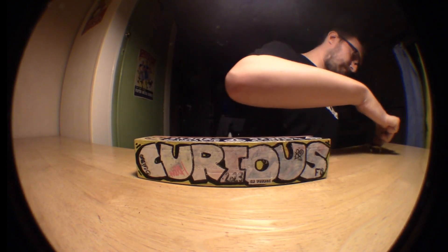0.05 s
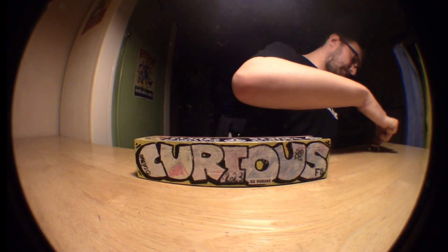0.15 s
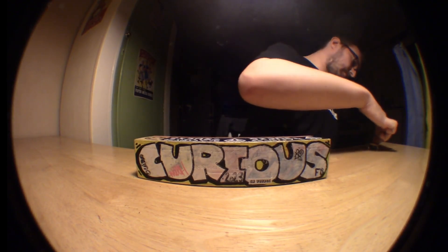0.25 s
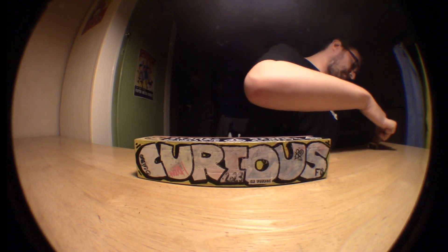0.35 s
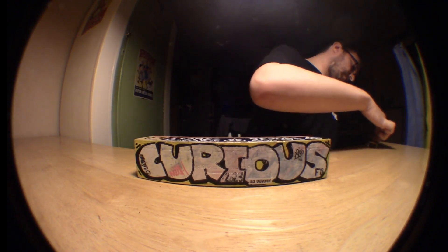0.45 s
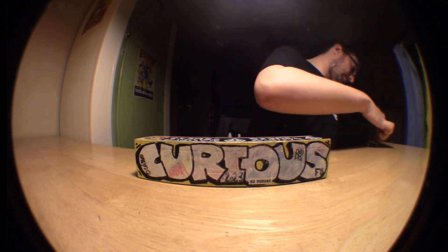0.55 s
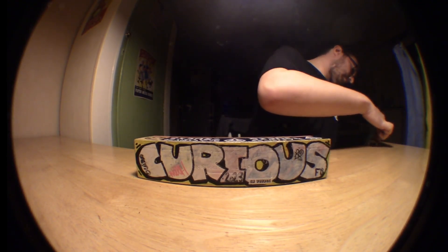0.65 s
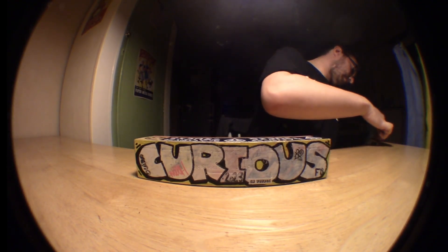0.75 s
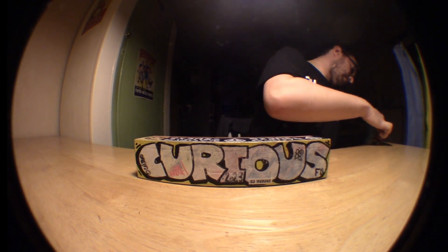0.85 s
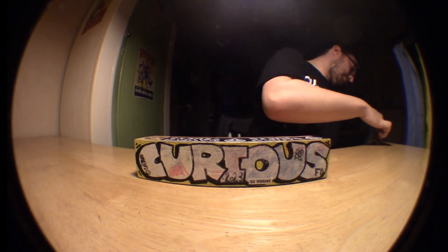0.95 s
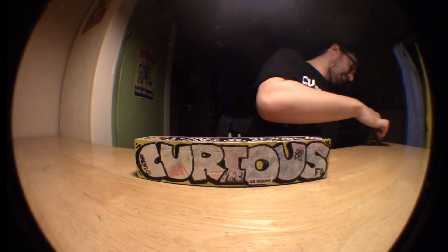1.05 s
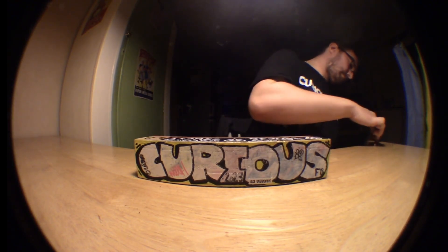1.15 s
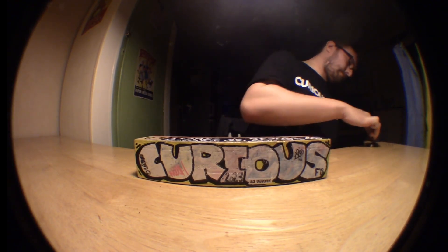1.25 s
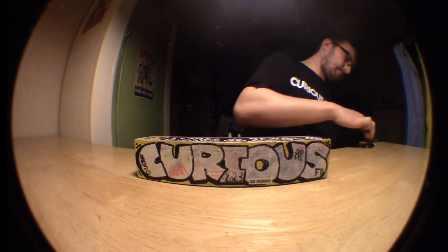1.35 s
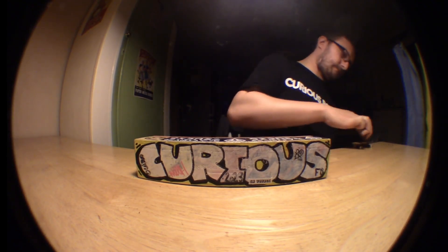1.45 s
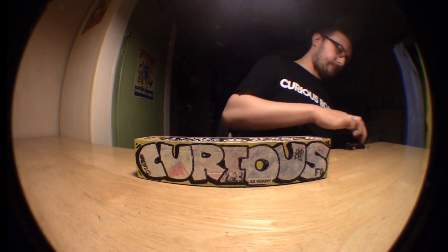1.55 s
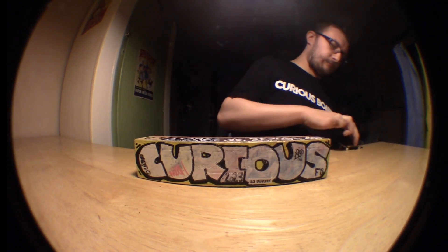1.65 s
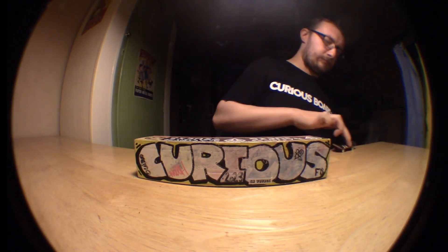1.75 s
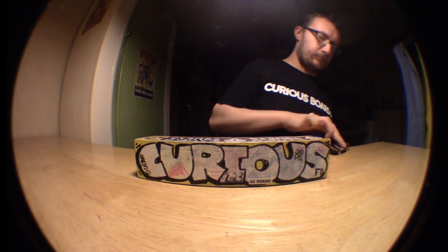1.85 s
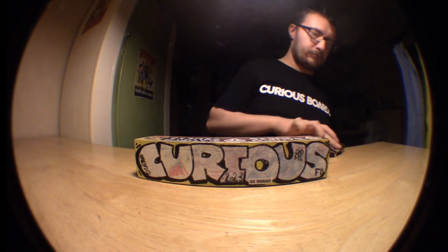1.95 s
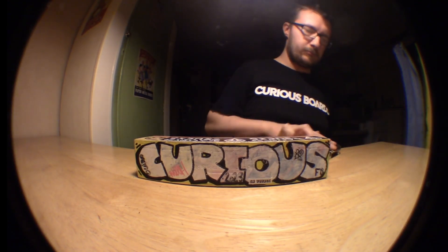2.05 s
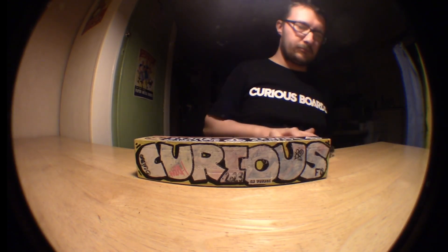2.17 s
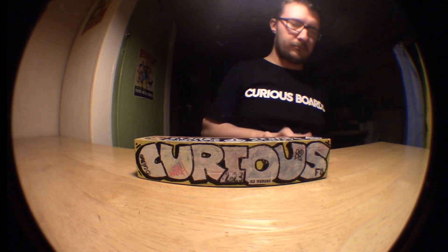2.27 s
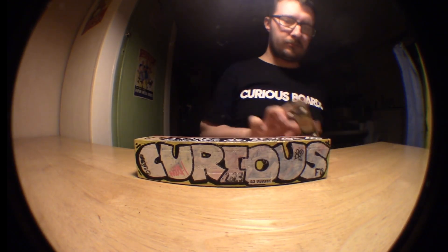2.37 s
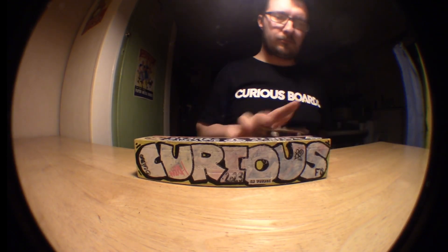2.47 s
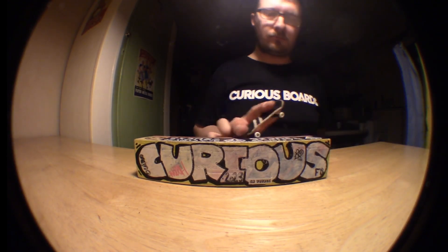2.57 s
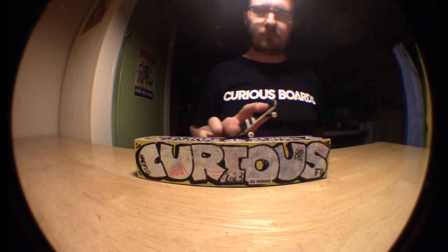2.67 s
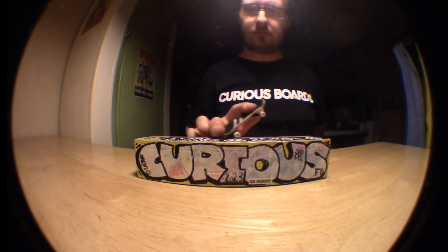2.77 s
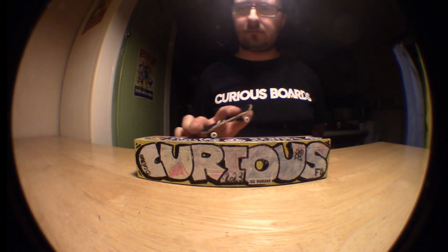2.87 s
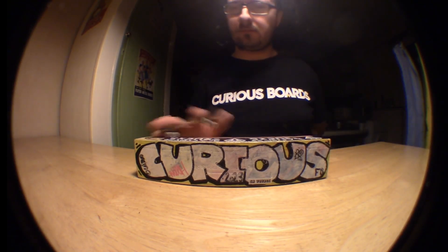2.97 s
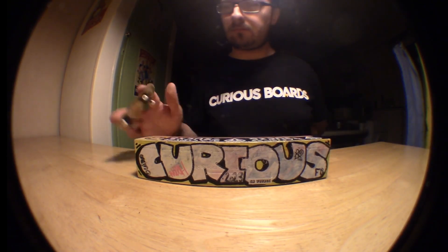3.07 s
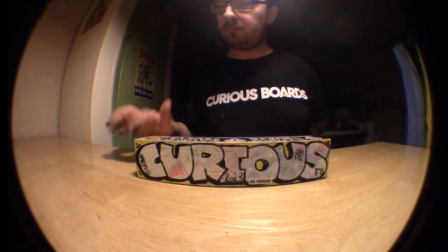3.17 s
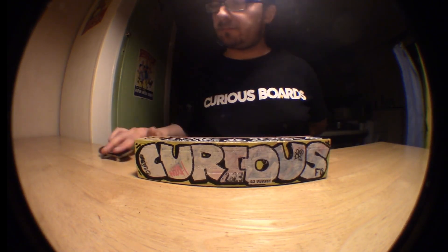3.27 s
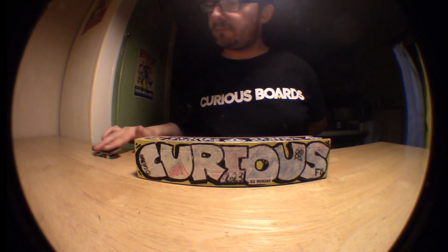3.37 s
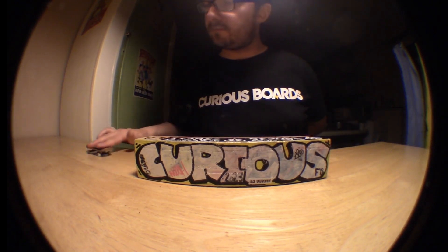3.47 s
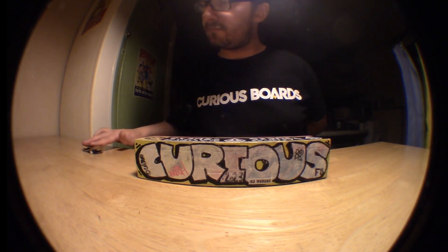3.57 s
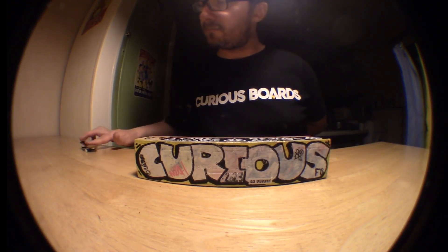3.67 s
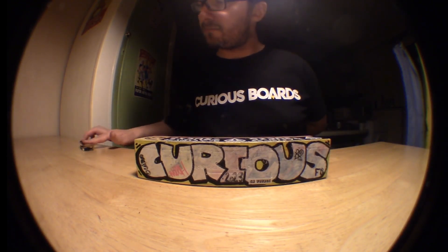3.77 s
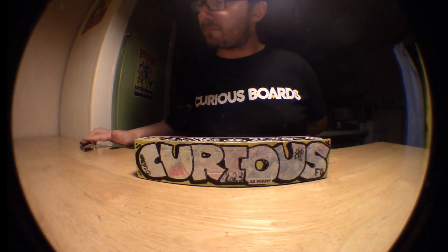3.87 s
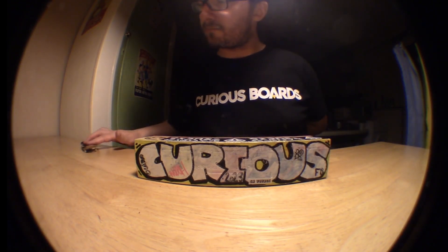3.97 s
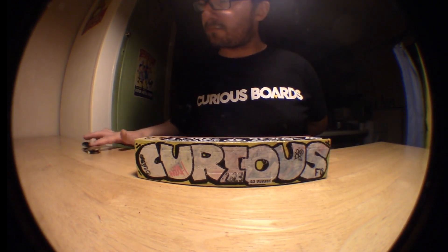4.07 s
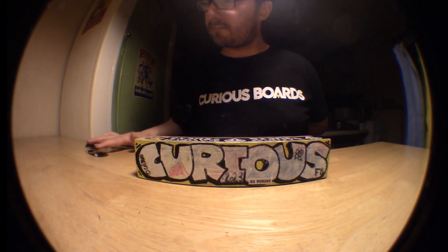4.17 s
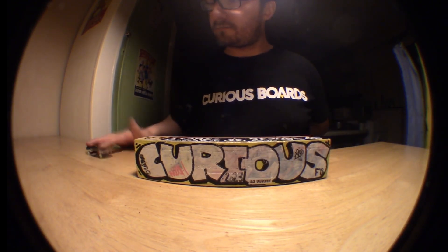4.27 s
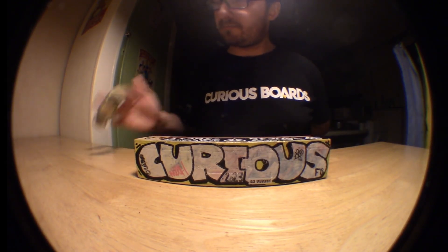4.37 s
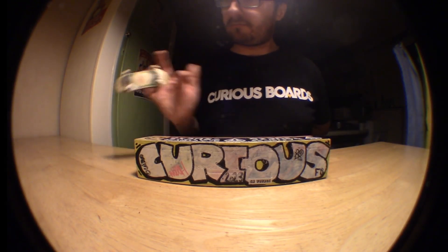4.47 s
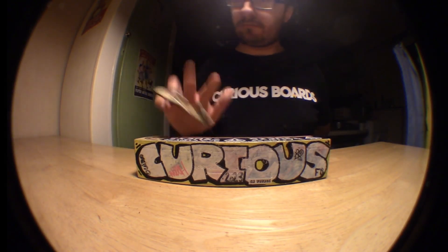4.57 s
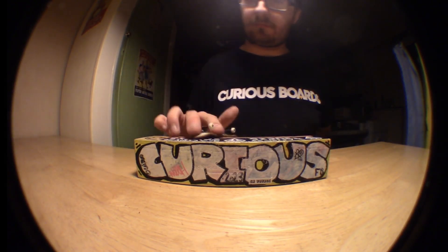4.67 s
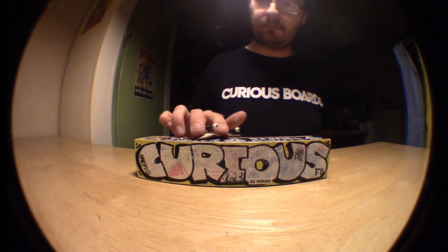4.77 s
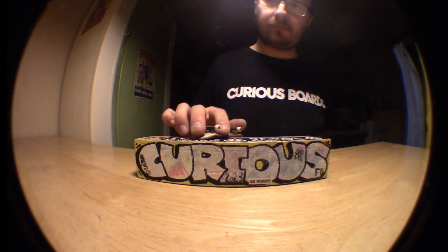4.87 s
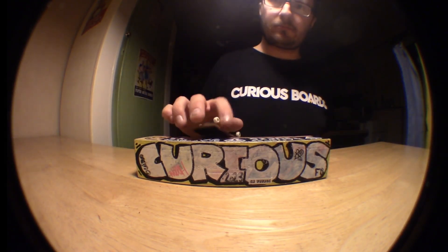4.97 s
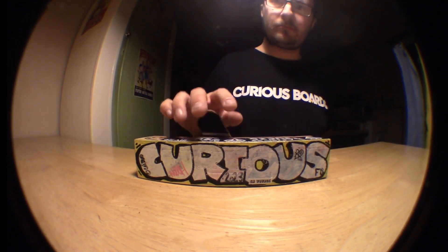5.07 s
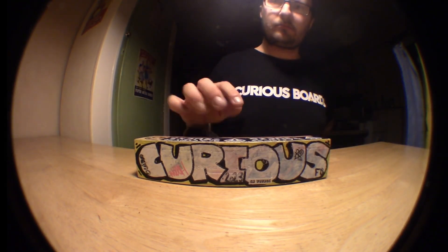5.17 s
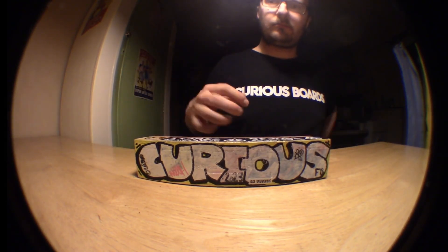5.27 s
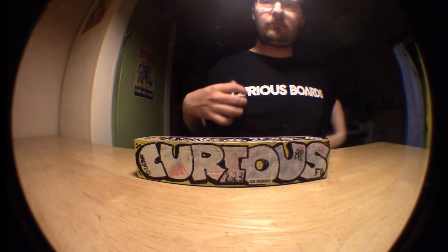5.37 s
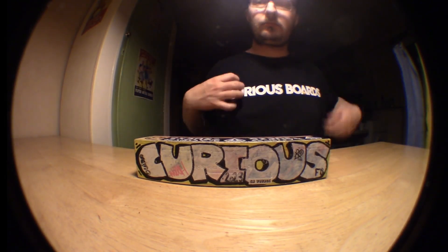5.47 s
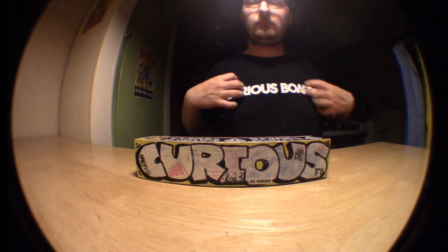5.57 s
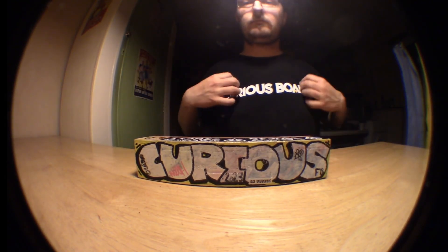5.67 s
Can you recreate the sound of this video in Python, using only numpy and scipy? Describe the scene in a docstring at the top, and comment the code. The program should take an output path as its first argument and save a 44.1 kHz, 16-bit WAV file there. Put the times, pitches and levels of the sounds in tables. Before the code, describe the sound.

Close up in a small, slightly echoing room, a toy finger skateboard rumbles lightly across a wooden table. A sharp pop leads to quick clacks and a squeaky scrape along a hollow box, then a hard landing. After more rolling comes another pop, loud clacks with a brief scrape, and a final clatter on the wood. Dull hand thuds sit faintly underneath.

```python
"""A fingerboard clacks on a wooden tabletop and a small hollow box: each contact cracks and rings modes.
It rolls up on hard wheels, pops off its tail, lands on the box and grinds along it with stick-slip
squeals, drops back to the table, returns for a second trick and clatters to rest.
The box is close; the table is heard mostly through a small, live room. Hand thuds and air lie beneath."""
import sys
import numpy as np
from scipy import signal
from scipy.fft import rfft, irfft, next_fast_len
from scipy.io import wavfile
from scipy.ndimage import map_coordinates

SR = 44100
rng = np.random.default_rng(int(sys.argv[2]) if len(sys.argv) > 2 else 0)


def log_audio(samples):
    """Write samples as a 16-bit WAV file to the path given in sys.argv[1]."""
    # one column per channel
    frames = np.atleast_2d(samples).T
    # limit to full scale, then quantise
    limited = np.clip(frames, -1, 1)
    pcm = np.round(limited * 32767).astype(np.int16)
    wavfile.write(sys.argv[1], SR, pcm)


N = 252693

# tabletop with the deck on it: pitch_hz, level_db, t60_s
TABLE_MODES = [(193, -11.5, 0.16), (334.7, -7.5, 0.16), (446, -3.5, 0.01), (510.4, 2.5, 0.12),
               (597, -3.5, 0.14), (810, -7, 0.28), (1206, -8, 0.0037), (1350, 7.5, 0.0064),
               (1690, -34, 0.0021), (1920, -36, 0.0088), (2630, 5, 0.039), (3860, 29, 0.0074),
               (4550, 4.5, 0.026), (5330, -23, 0.016), (7570, -5.5, 0.0055)]
# spectrum of a bare contact: freq_hz, density_db
CRACK_SPECTRUM = [(25, -7.5), (70, 5.5), (150, -14), (500, 15), (1000, 4), (2500, 4.5), (4500, 11.5),
                  (6000, -4), (8000, -8), (11000, -17), (16000, -54)]


def table_clacks():
    """The wheels click on the tabletop; the board lands and clatters on it."""
    hits = [(1.5545, -27.5, -22, 1), (2.025, -33, -8, -4), (3.2597, -2.5, -12, -3.5), (3.264, -3.5, 3, 0.5),
            (3.2816, -7, -13, 5), (5.1107, 3.5, -5.5, -12.5), (5.232, -16, 0, 1), (5.279, -10.5, 0, 1),
            (5.2834, -4, 4, 3.5), (5.3398, -14, 0.5, 2.5), (5.3684, -10.5, 4, 5), (5.4066, -11, -27, -1)]  # start_s, level_db, weight_db, hardness_db
    return strikes(hits, TABLE_MODES, gain_db=18, crack_db=0.5, crack_t60_s=0.029, wet_db=-0.5,
                   knock_db=-5.5, ring_db=-2, tick_db=-17.5, low_cut_hz=83, dull_hz=2360)


def box_clacks(modes):
    """The board strikes the hollow box."""
    hits = [(2.5197, -2, -9.5, 4.5), (2.529, 2.5, -8, -12), (2.5705, -0.5, -16, -1),
            (2.5965, -2.5, -4, -1.5), (2.6105, -1.5, 0.5, -9.5), (2.762, -9, -2, -12.5),
            (2.779, -4.5, -12, -5.5), (2.7945, -0.5, -6, -5.5), (2.801, -2.5, -23, -0.5),
            (2.83, -1, -2.5, -8), (2.901, -8.5, -40, 2.5), (2.9218, -2.5, -10, -1.5), (2.999, -5, -16, 4.5),
            (3.0372, -7, -20, 6), (4.6493, 9.5, -12.5, -7), (4.665, 3.5, -12, -7), (4.6962, -1.5, 0, -3),
            (4.727, -1, 2, -8), (4.7564, 2, -12, -4.5)]  # start_s, level_db, weight_db, hardness_db
    return strikes(hits, modes, gain_db=12, crack_db=-3.5, crack_t60_s=0.031, wet_db=-1.5,
                   knock_db=-1, ring_db=0, tick_db=-10, low_cut_hz=100, dull_hz=1380, full_hz=5420)


def tail_pops():
    """The deck's tail snaps against the table."""
    pops = [(2.3518, -2), (4.3562, -4)]  # start_s, level_db
    modes = [(279, -27, 0.047), (351, -4, 0.027), (480, 14, 0.07), (601, -10, 0.26), (698, -3, 0.087),
             (1330, 1, 0.034), (1890, -5, 0.034), (3610, 5, 0.013), (4000, 6, .009), (4920, -5, 0.0032),
             (5410, -1.5, 0.03), (6330, -1.5, 0.0068), (7500, -12.5, 0.013), (9600, -22, 0.0053)]  # tail on tabletop: pitch_hz, level_db, t60_s
    return strikes(pops, modes, gain_db=9, crack_db=-6, crack_t60_s=0.016, wet_db=3,
                   knock_db=3, ring_db=3, tick_db=-1, low_cut_hz=186, dull_hz=2500)


def grinding(modes):
    """The trucks catch and slip along the box edge; three contacts ring it at shifting strengths."""
    slides = [(2.559, 2.641, -22.5, 1.5, 2.5), (2.658, 2.766, -30, -5.5, -0.5), (2.751, 2.807, -22, 1, 2),
              (2.83, 2.928, -19.5, 2.5, 2), (2.94, 3.07, -20.5, -0.5, 5), (4.703, 4.773, -17, -4.5, -3)]  # start_s, end_s, level_db, weight_db, bright_db
    cavity = [(158, 58, 12.5), (370, 28, 1)]  # air in the box: centre_hz, width_hz, gain_db
    top_hz = 10350
    scrape = np.zeros(N)
    for _ in range(3):
        slips = grains(rate_hz=200, spread_db=5.5) + 0.57 * rng.standard_normal(N)
        response = impact(modes, crack_db=-1, crack_t60_s=0.02, scatter_db=4, low_cut_hz=116)
        scrape += amp(3.3 * wobble(22)) * signal.oaconvolve(slips, response)[:N]
    scrape = filtered(scrape, lambda hz: amp(peaks_db(cavity, hz)) / np.hypot(1, (hz / top_hz) ** 4))
    boom, knock, ring, metal = map(unit, bands(scrape, (480, 950, 2400)))
    out = np.zeros(N)
    for start_s, end_s, level_db, weight_db, bright_db in slides:
        sound = (amp(weight_db - 6) * boom + amp(-bright_db - 6) * knock
                 + amp(-2) * ring + amp(bright_db - 3) * metal)
        out += amp(level_db) * stroke(start_s, end_s, attack_s=0.005, release_s=0.0028) * sound
    return room(out, wet_db=-5)[:, :N]


def squeals():
    """Friction locks onto one resonance: a rough tone that swells and breaks off."""
    events = [(2.238, 2.29, 3450, 820, -25.5), (2.752, 2.796, 1270, 223, -16),
              (2.831, 2.938, 1271, 255, -14), (2.94, 3.009, 2680, 402, -19.5),
              (2.953, 3.043, 4250, 524, -15), (3.045, 3.071, 1276, 246.5, -12.5),
              (3.045, 3.076, 1620, 69.4, -16.5)]  # start_s, end_s, pitch_hz, width_hz, level_db
    out = np.zeros(N)
    for start_s, end_s, pitch_hz, width_hz, level_db in events:
        size = round((end_s - start_s) * SR)
        progress = np.linspace(0, 1, size)
        swell = np.sqrt(4 * progress * (1 - progress))
        hz = pitch_hz + width_hz / 2 * wobble(724, size)
        tone = np.sin(2 * np.pi * np.cumsum(hz) / SR) * amp(2.1 * wobble(350, size))
        add(out, start_s, amp(level_db - 1.5) * swell * unit(tone))
    return room(out, wet_db=-9)[:, :N]


def rolling(bumps):
    """Hard wheels patter and throb over the grain, bearings whirr; push and scrub bring up the grit."""
    # one entry per stretch of table
    pushes = [
        [(0, -33.5), (.09, -30.5), (.2, -36), (.56, -38.5)],
        [(.58, -39.5), (.84, -34), (.97, -51), (1.1, -36.5), (1.6, -29), (1.81, -21), (1.95, -27.5),
         (2.08, -34), (2.25, -29), (2.33, -32.5)],
        [(3.28, -18), (3.34, -18.5), (3.45, -28), (3.75, -32), (3.88, -45), (3.96, -36), (4.1, -32.5),
         (4.27, -28), (4.34, -33)],
    ]  # hand push curves: time_s, level_db
    spectra = [
        [(40, -40), (90, -30), (180, -9.5), (420, 4), (620, -4.5), (760, -12), (920, -8.5), (1180, -4.5),
         (1750, -25), (3200, -25.5), (4300, -19), (6500, -32.5), (8200, -36), (14000, -79)],
        [(40, -34), (90, -38), (180, -20), (480, 2.5), (640, -4.5), (790, -0.5), (1100, -0.5), (2300, -11),
         (3000, -16.5), (3500, -17.5), (4150, -18.5), (5500, -33.5), (8200, -40.5), (14000, -74)],
        [(40, -33), (90, -13), (180, -11), (400, 2), (600, 4.5), (760, 2.5), (930, -1.5), (1230, 2.5),
         (1800, -1.5), (2700, -15.5), (4200, -18), (5800, -28), (8200, -40), (14000, -65.5)],
    ]  # wheel spectra: freq_hz, density_db
    surfaces = [(-6, -12, -51.5), (-13, -15, -51), (-9.5, -11.5, -60)]  # roughness: grit_db, hiss_db (both re rumble), whirr_db
    # common to all stretches
    scrubs = [(0.032, 0.086, -33, -44.5), (1.338, 1.563, -42, -44.5), (2.12, 2.29, -42, -39.5),
              (3.285, 3.358, -43.5, -18.5), (3.495, 3.753, -36, -45), (4.143, 4.27, -30, -39.5),
              (4.326, 4.355, -27.5, -29)]  # sideways wheel slip: start_s, end_s, grit_db, hiss_db
    wood = [(207, 33, 10.5), (308, 67, 5), (520.6, 34, 10.5), (608, 23, 6.5), (753.4, 77, 12),
            (1185, 20, 4), (1773, 24, 6), (2845, 65, 10), (3970, 540, 4.5)]  # tabletop and deck resonances: centre_hz, width_hz, gain_db
    bearings = [(2000, -17), (3500, -1), (4200, 2), (5400, -5), (6500, -17.5), (8200, -20), (13000, -45.5)]  # bearing spectrum: freq_hz, density_db
    firm_push_db, full_spin_db = -23.5, -37
    throb = amp(1.16 * wobble(29.994) + 0.98 * wobble(90))
    scrub_grit, scrub_hiss = sum(
        amp(levels_db)[:, None] * stroke(start_s, end_s, attack_s=0.063, release_s=0.053)
        for start_s, end_s, *levels_db in scrubs)
    jolts = sum(amp(level_db - 6) * stroke(start_s, start_s + 0.012, attack_s=0.0024, release_s=0.0029)
                for start_s, level_db in bumps)
    whirr = noise(bearings)
    out = np.zeros((2, N))
    for points, spectrum, (grit_db, hiss_db, whirr_db) in zip(pushes, spectra, surfaces):
        pair = np.array([grains(rate_hz=4000, spread_db=1.5), grains(rate_hz=4000, spread_db=2)])
        patter = stereo(filtered(pair, lambda hz: amp(log_interp(spectrum, hz) + peaks_db(wood, hz))))
        rumble, grit, hiss = map(unit, bands(patter, (1000, 2800)))
        push = envelope(points, fade_s=0.03)
        effort, on_table = push / amp(firm_push_db), push > 0
        grit_gain = np.hypot(amp(firm_push_db + grit_db + 1.7 * wobble(22)) * effort ** 1.17, scrub_grit)
        hiss_gain = np.hypot(amp(firm_push_db + hiss_db) * effort ** 1.65, scrub_hiss)
        treble = throb * (grit_gain * grit + hiss_gain * hiss)
        out += on_table * (np.hypot(throb * push, jolts) * rumble + treble)
        out += amp(whirr_db) * np.minimum(push / amp(full_spin_db), 1) * whirr
    return out


def wheel_knocks(bumps):
    """The wheels knock over flaws in the wood."""
    return strikes(bumps, TABLE_MODES, gain_db=-0.5, crack_db=-1, crack_t60_s=0.011, wet_db=-7,
                   knock_db=17, ring_db=1, tick_db=-24, low_cut_hz=430, dull_hz=2500)


def hand_thuds():
    """The hand leans on the wood with a short, dull thud."""
    presses = [(2.61, -16), (3.27, -18), (3.998, -18.5), (4.358, -16), (4.96, -24), (5.312, -16)]  # start_s, level_db
    attack_s, decay_s = 0.0075, 0.021
    t = np.arange(SR // 4) / SR
    tone = sum(amp(db) * np.sin(2 * np.pi * hz * t) for hz, db in [(88, -17), (125, -11.5), (165, -12)])
    thud = tone * np.exp(-t / decay_s) * (1 - np.exp(-t / attack_s))
    out = np.zeros((2, N))
    for start_s, level_db in presses:
        add(out, start_s, amp(level_db) * thud)
    return out


def background():
    """Quiet room air; a faint rustle as the arms lift at the end."""
    air_spectrum = [(25, -48), (60, -19), (170, 13.5), (500, 0.5), (1200, -2.5), (2500, -11.5),
                    (4300, -12.5), (8000, -21.5), (16000, -31)]  # freq_hz, density_db
    rustle = envelope([(5.6, -57), (5.64, -55.5), (5.73, -60)], fade_s=0.034)
    return amp(-51) * noise(air_spectrum) + rustle * noise(CRACK_SPECTRUM)


def strikes(hits, modes, gain_db, crack_db, crack_t60_s, wet_db, knock_db, ring_db, tick_db,
            low_cut_hz, dull_hz, full_hz=6500):
    """Impacts on one body, in the room: weight adds knock, hardness tilts the treble above dull_hz."""
    out = np.zeros((2, N))
    margin = SR // 1000
    for start_s, level_db, *touch in hits:
        weight_db, hardness_db = touch or (0, 0)
        contact = impact(modes, crack_db, crack_t60_s, scatter_db=1.5, low_cut_hz=low_cut_hz)
        parts = bands(contact, (950, 2800, 5500))
        gains = amp([knock_db + weight_db, 0, ring_db, tick_db])
        sound = sum(gain * part / np.linalg.norm(part) for gain, part in zip(gains, parts))
        sound = filtered(np.pad(sound, (margin, 0)),
                         lambda hz: amp(hardness_db * np.interp(hz, [dull_hz, full_hz], [0, 2])))
        add(out, start_s - margin / SR, room(amp(level_db + gain_db) * sound, wet_db))
    return out


def impact(modes, crack_db, crack_t60_s, scatter_db, low_cut_hz):
    """One contact: a crack plus modes at random strengths, with the bass cut below low_cut_hz."""
    t = np.arange(SR // 6) / SR
    pitch_hz, level_db, t60_s = np.transpose(modes)[:, :, None]
    strength, detune = rng.standard_normal((2, len(modes), 1))
    polarity = (-1) ** np.arange(len(modes))[:, None]
    swing = polarity * np.sin(2 * np.pi * pitch_hz * (1 + 0.0043 * detune) * t)
    ring = np.sum(amp(level_db + scatter_db * strength - 60 * t / t60_s) * swing, axis=0)
    # the wood disperses the impulse over a few ms
    decay = amp(-60 * t / crack_t60_s)
    phase = np.angle(rfft(rng.standard_normal(len(t)) * decay))
    magnitude = amp(log_interp(CRACK_SPECTRUM, np.fft.rfftfreq(len(t), 1 / SR)))
    crack = irfft(magnitude * np.exp(1j * phase), len(t)) * np.sqrt(decay)
    sound = unit(ring) + amp(crack_db) * unit(crack)
    return signal.sosfilt(signal.butter(2, low_cut_hz, "high", fs=SR, output="sos"), sound)


def room(x, wet_db, build_s=0.0042):
    """Direct sound plus a diffuse stereo tail that builds as the walls answer."""
    decay = [(100, 0.67), (260, 0.34), (700, 0.41), (1840, 0.43), (4850, 0.38), (8000, 0.31), (13000, 0.28)]  # reverberation: freq_hz, t60_s
    colour = [(30, -11), (120, 2.5), (500, -1.5), (1200, -2.5), (4000, -5.5), (8000, 2.5), (12000, -5.5),
              (16000, -21)]  # tail spectrum: freq_hz, gain_db
    resonances = [(329, 30, 7.5), (513, 20, 4), (600, 8.4, -10), (789, 15, 1.5), (1265, 160, -9.5),
                  (1488, 25, 8), (1765, 36, 12)]  # table and room: centre_hz, width_hz, gain_db
    hz, frame_s, frames = signal.stft(rng.standard_normal((2, 2 * SR // 5)), SR, nperseg=256)
    frames = frames * amp(-60 * frame_s / log_interp(decay, hz)[:, None])
    tail = signal.istft(frames, SR, nperseg=256)[1]
    tail /= np.linalg.norm(tail[0])
    tail = stereo(filtered(tail, lambda hz: amp(log_interp(colour, hz) + peaks_db(resonances, hz))))
    t = np.arange(tail.shape[1]) / SR
    response = amp(wet_db) * tail * (1 - np.exp(-(t / build_s) ** 2))
    response[:, 0] += 1
    return signal.fftconvolve(x[None], response, axes=1)


def stereo(pair):
    """Two unrelated signals as mid and side: nearly mono."""
    width = [(30, -12), (150, -19.5), (500, -22.5), (1200, -15), (4000, -20), (8000, -8), (14000, -32)]  # side re mid: freq_hz, gain_db
    side = filtered(pair[1], lambda hz: amp(log_interp(width, hz)))
    return np.array([pair[0] + side, pair[0] - side])


def noise(spectrum):
    """Coloured stereo noise, rms 1."""
    return unit(stereo(filtered(rng.standard_normal((2, N)), lambda hz: amp(log_interp(spectrum, hz)))))


def grains(rate_hz, spread_db):
    """Random tiny impacts of log-normal size, rms 1."""
    impulses = (rng.random(N) < rate_hz / SR) * rng.choice([-1, 1], N)
    return unit(impulses * amp(spread_db * np.clip(rng.standard_normal(N), -2, 2)))


def wobble(rate_hz, size=N):
    """Smooth curve through random knots."""
    knots = rng.standard_normal(int(size * rate_hz / SR) + 4)
    fine = np.linspace(0, len(knots) - 1, 8 * len(knots))
    return np.interp(np.arange(size) * rate_hz / SR, fine, map_coordinates(knots, [fine]))


def stroke(start_s, end_s, attack_s, release_s):
    """Contact envelope: bite, hold, decay."""
    t = np.arange(N) / SR
    return np.clip((t - start_s) / attack_s, 0, 1) * np.exp(-np.maximum(t - end_s, 0) / release_s)


def envelope(points, fade_s):
    """Gain through the points, fading outside them."""
    time_s, level_db = np.transpose(points)
    t = np.arange(N) / SR
    gate = np.clip(1 + np.minimum(t - time_s[0], time_s[-1] - t) / fade_s, 0, 1)
    return gate * amp(np.interp(t, time_s, level_db))


def bands(x, edges_hz):
    """Causal band split, lowest first."""
    parts = []
    for hz in edges_hz:
        low, high = (np.tile(signal.butter(2, hz, kind, fs=SR, output="sos"), (2, 1))
                     for kind in ("low", "high"))
        parts.append(signal.sosfilt(low, x))
        x = signal.sosfilt(high, x)
    return parts + [x]


def filtered(x, response):
    """FFT filter by response(hz)."""
    size = x.shape[-1]
    padded = next_fast_len(size + SR // 20, True)
    return irfft(rfft(x, padded) * response(np.fft.rfftfreq(padded, 1 / SR)), padded)[..., :size]


def peaks_db(resonances, hz):
    return sum(gain_db / (1 + (2 * (hz - centre_hz) / width_hz) ** 2)
               for centre_hz, width_hz, gain_db in resonances)


def log_interp(points, hz):
    freq_hz, values = np.transpose(points)
    return np.interp(np.log(hz + 1), np.log(freq_hz + 1), values)


def add(track, start_s, sound):
    start = round(start_s * SR)
    track[..., start:start + sound.shape[-1]] += sound[..., :max(N - start, 0)]


def amp(db):
    return 10 ** (np.asarray(db) / 20)


def unit(x):
    return x / np.sqrt(np.mean(x ** 2) + 1e-20)


def scene():
    """All sources summed; left slightly leads right."""
    box_modes = [(168, -28, 0.034), (375, -13.5, 0.033), (807, -7.5, 0.11), (977, -3, 0.014),
                 (1238, 2.5, 0.04), (1440, -17.5, 0.011), (1639, -19.5, 0.14), (2033, -18, 0.064),
                 (2610, 2.5, 0.017), (3183, -4.5, 0.038), (3640, -6.5, 0.01), (4068, 3, 0.028),
                 (4470, 0, 0.014), (5150, -1.5, 0.0087), (6720, -15.5, 0.024), (7670, -12.5, 0.0096)]  # box with the metal trucks on it: pitch_hz, level_db, t60_s
    bumps = [(.082, -26), (.712, -30), (0.776, -37), (1.107, -28), (1.135, -28), (1.412, -20.5),
             (1.556, -19), (3.7214, -27), (3.892, -28)]  # flaws under the wheels: start_s, level_db
    lead_s = 7e-6
    mix = tail_pops() + table_clacks() + wheel_knocks(bumps) + box_clacks(box_modes)
    mix += grinding(box_modes) + squeals() + rolling(bumps) + hand_thuds() + background()
    return filtered(mix, lambda hz: np.exp(1j * np.pi * hz * lead_s * np.array([[1], [-1]])))


def record(dry):
    """Soft clip of the hardest clacks, then a band limit."""
    top_hz = 15800
    clipped = dry / (1 + np.abs(dry) ** 4) ** (1 / 4)
    return filtered(clipped, lambda hz: hz < top_hz)


dry = scene()
out = record(dry)
log_audio(out)
```